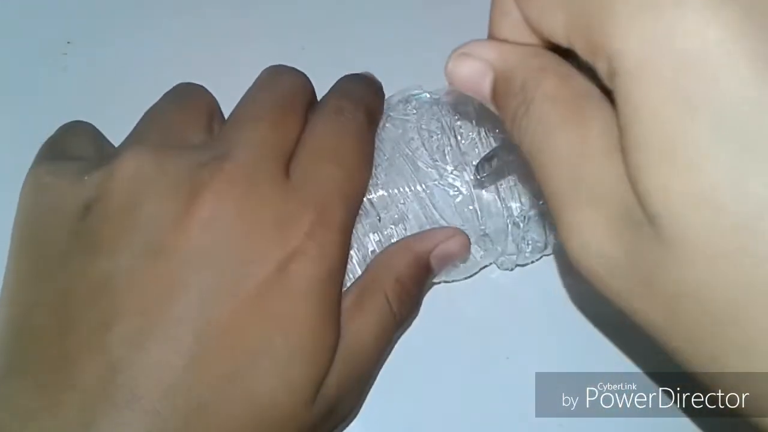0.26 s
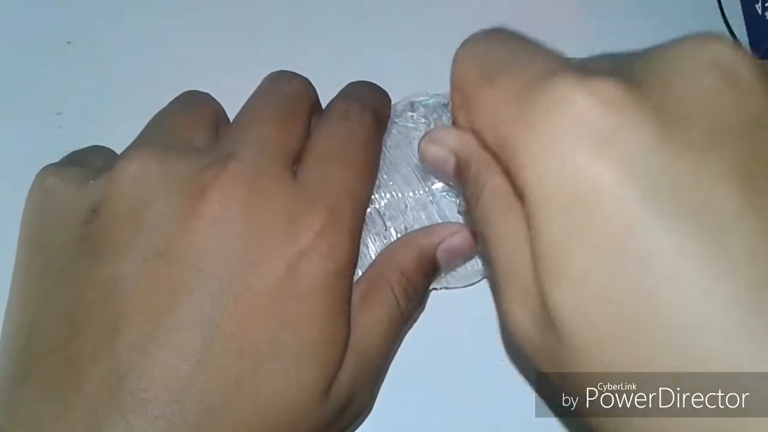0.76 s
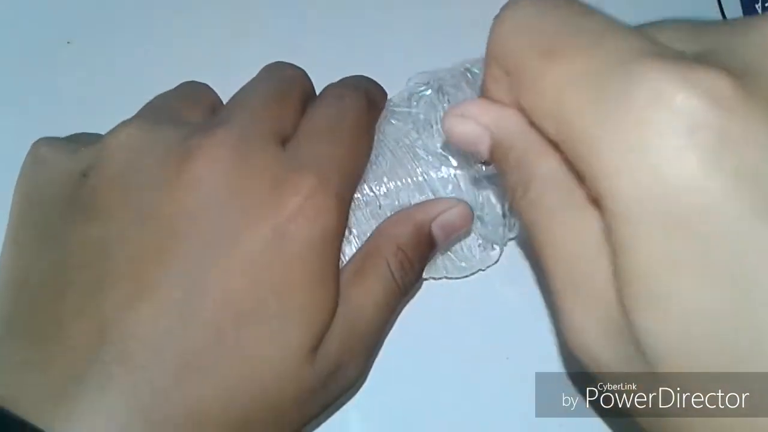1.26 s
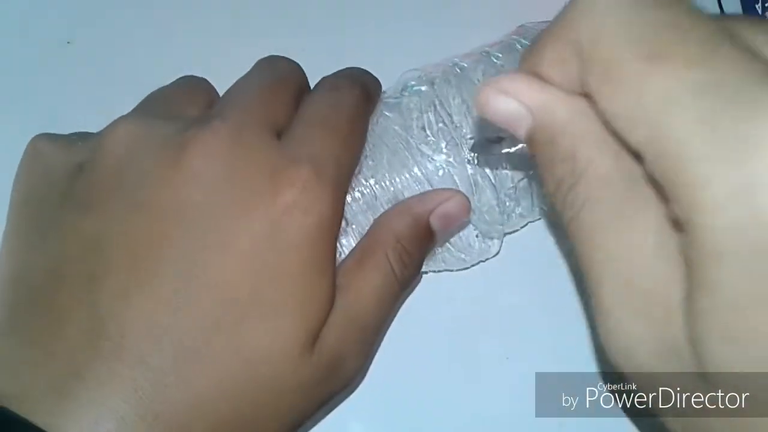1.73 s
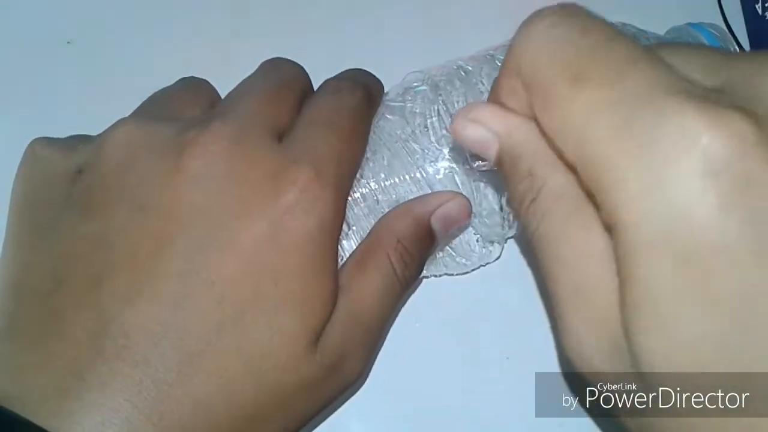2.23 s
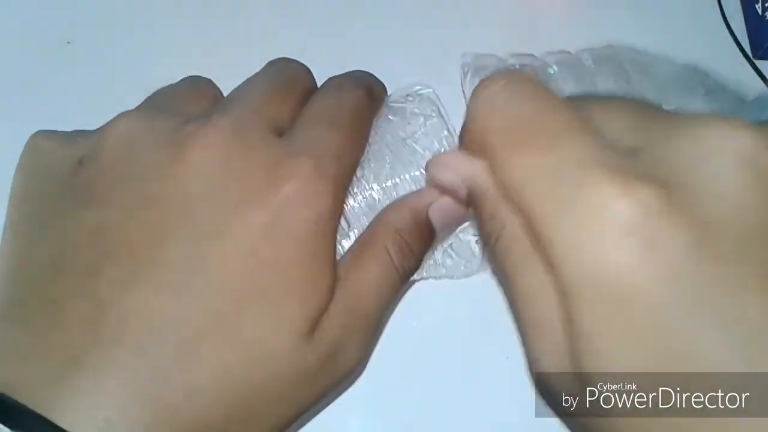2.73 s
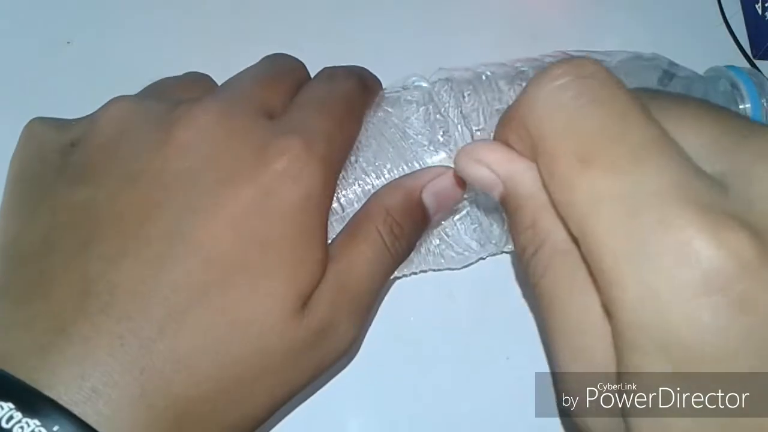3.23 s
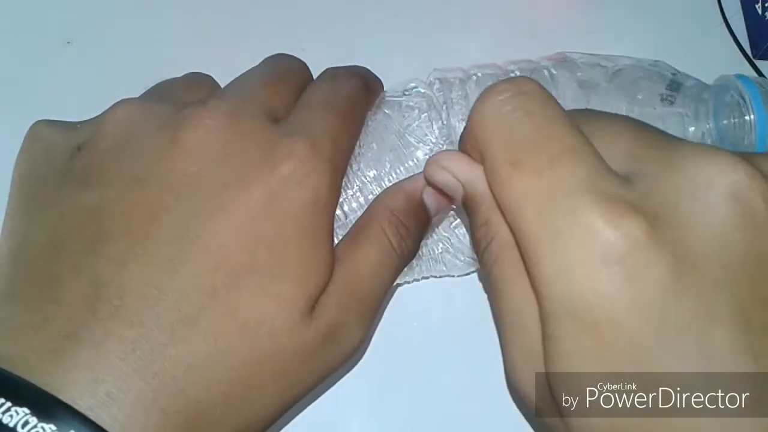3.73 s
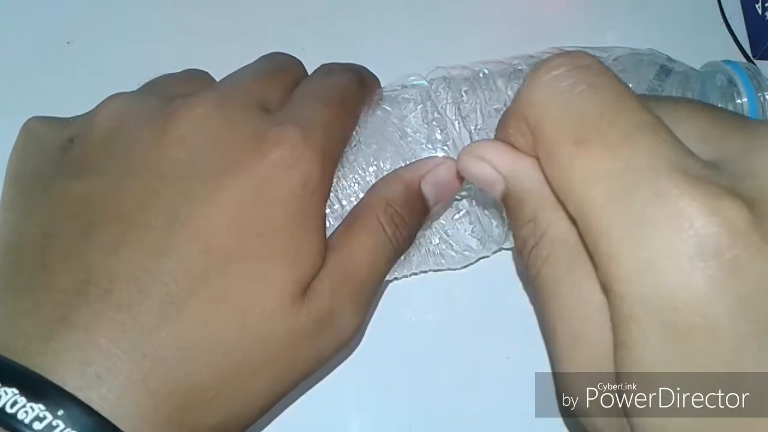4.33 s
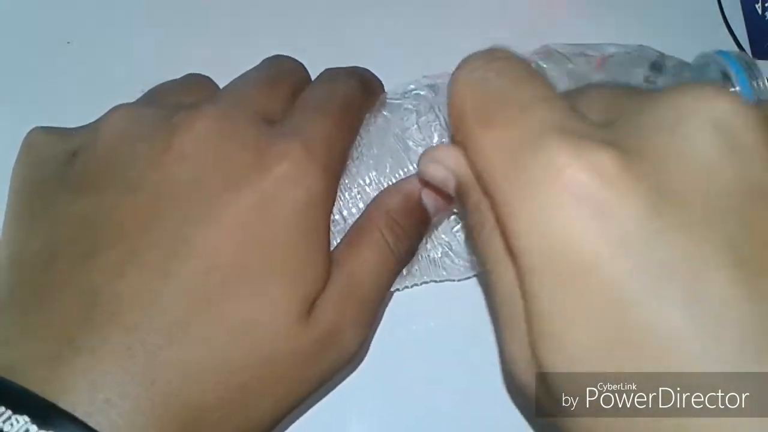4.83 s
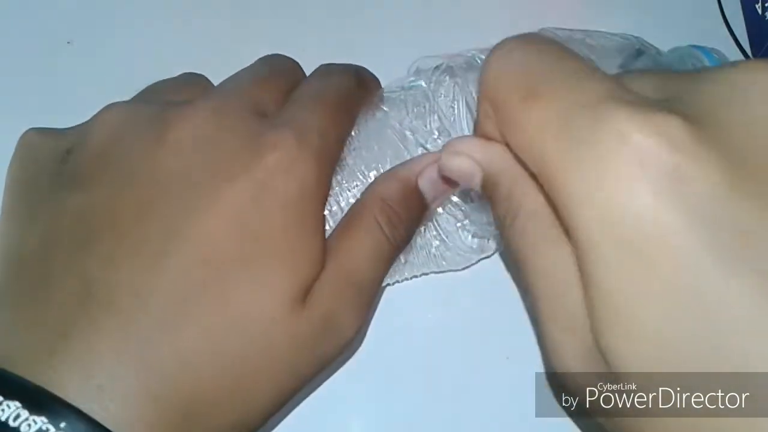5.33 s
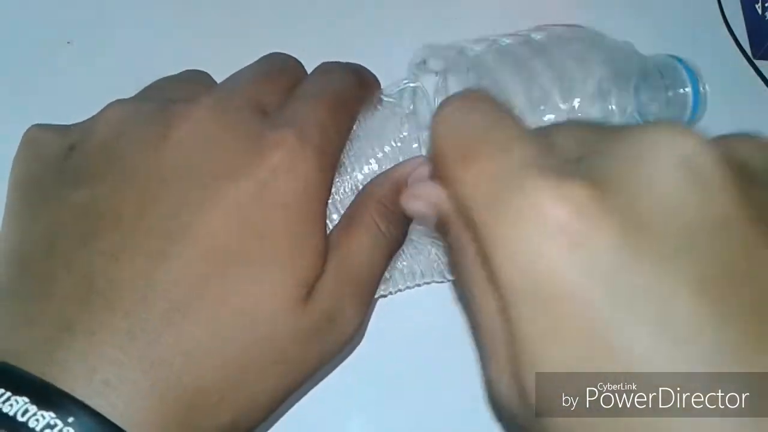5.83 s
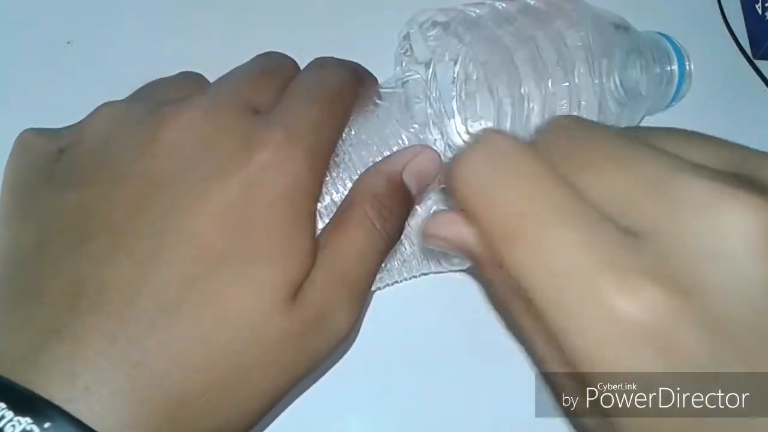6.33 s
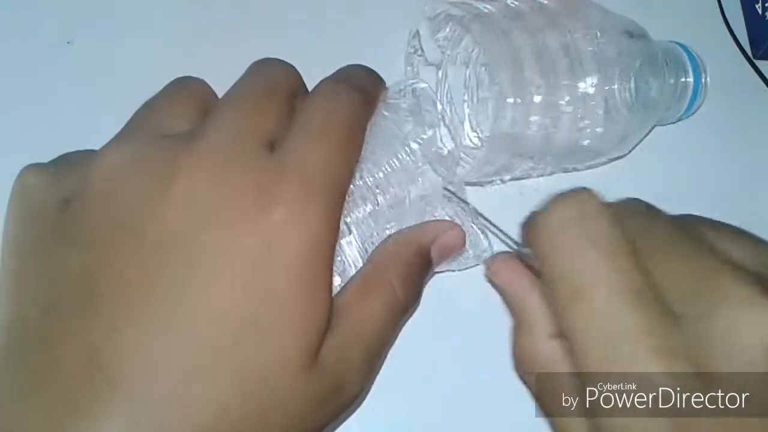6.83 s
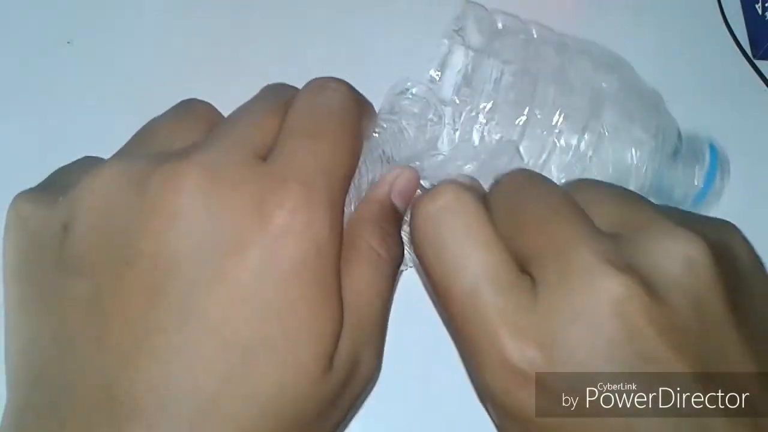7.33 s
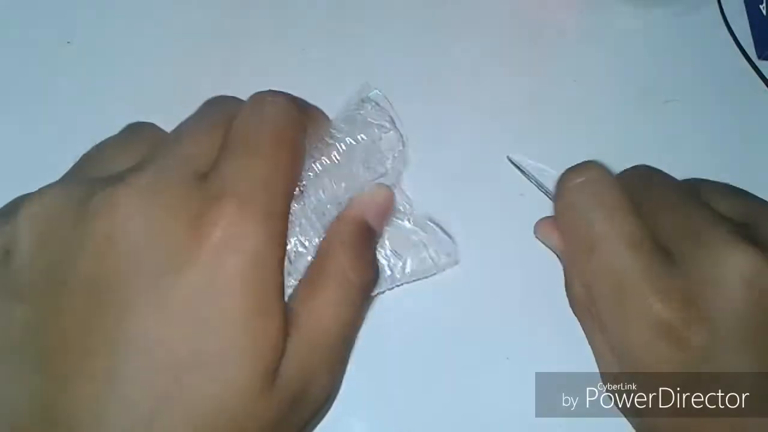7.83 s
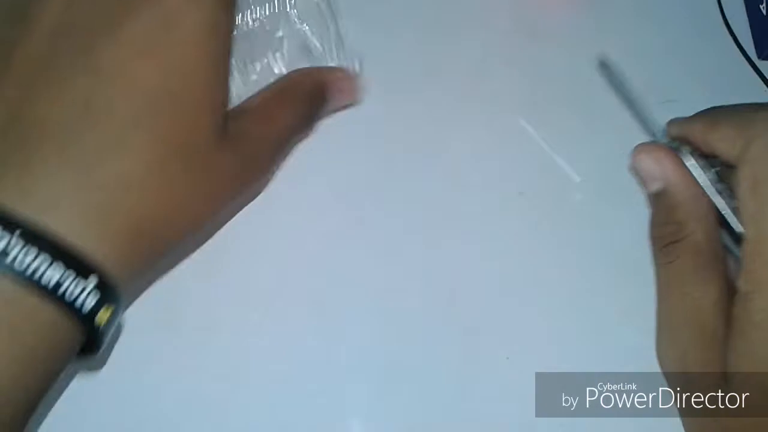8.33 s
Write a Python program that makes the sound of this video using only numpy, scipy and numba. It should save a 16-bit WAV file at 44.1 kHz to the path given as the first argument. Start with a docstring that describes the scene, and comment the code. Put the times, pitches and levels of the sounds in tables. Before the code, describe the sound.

A thin plastic bottle is pressed against a desk and cut with a small blade, close to the microphone. It starts with a few sharp snaps and a brief rasp as the blade runs over the ribs. Irregular clusters of hollow pops and crackles follow, with fine scraping and rubbing between them. A last, slightly fuller burst comes as the halves separate, then the crackle thins out. The room is small, with a quiet hiss.

```python
"""A thin plastic bottle is held on a desk, squeezed and cut open with a small blade, close to a microphone.
From the start its wall buckles in snaps that ring the ribs, air and wall; between snaps, blade and
fingers rub it in dense tiny slips. Near 0.8 s the blade ratchets over the ribs. Clusters of snaps follow
as the cut grows, more bass passes through the desk as the halves come loose, and at 8.1 s the grip
loosens and the fine crackle ends. Throughout, a small room answers over quiet hiss and faint tones."""
import sys
import numpy as np
from scipy import signal
from scipy.fft import rfft, irfft
from scipy.io import wavfile
from numba import njit

SR = 44100
rng = np.random.default_rng(int(sys.argv[2]) if len(sys.argv) > 2 else 0)


def generate_wav(sig):
    """Save sig (samples, or channels by samples) to the path in sys.argv[1] as 16-bit PCM at SR."""
    pcm = np.round(np.clip(np.atleast_2d(sig).T, -1, 1) * 32767).astype(np.int16)
    wavfile.write(sys.argv[1], SR, pcm)


N = 377937
TIME = np.arange(N) / SR
RASP_S, RASP_LENGTH_S, RASP_STEPS = .769, .134, 17


def bottle():
    """Modal superposition: ribs, air, wall and a treble crack ring to the same snaps and strokes."""
    # Each row: frequency of a mode in Hz, relative level in dB, time to decay by 60 dB in seconds.
    rib_modes = [(1057.6, 11, 0.049), (1173.6, 9.5, 0.046), (1332, 16, 0.013), (1591, 1.5, .018),
                 (1796, 2.5, 0.04), (2085, 4, 0.028), (2276, -3.5, 0.048), (2622, 7.5, 0.0091),
                 (3034, -5, 0.03), (3330, -11, 0.022)]
    air_modes = [(210, -5, 0.014), (332, 16, 0.045), (470.2, 7.5, 0.064)]
    wall_modes = [(603, -8.5, 0.023), (646, 22, 0.038), (685, -6.5, 0.046), (800, -34.5, .02)]
    crack_modes = [(3950, 0.5, 0.0032), (4600, -10.5, 0.0057), (5340, 5, 0.0016), (7740, 2.5, 0.001),
                   (9340, -4, 0.00062), (11000, -4, 0.0014), (13850, -18, 0.0027)]
    # Brightness as the cut grows. Each row: time in seconds, tilt of ribs, air and crack in dB per octave.
    brightness = [(0, 6.5, -4, -3), (.85, 8.5, 6.5, -6.5), (1.301, 2.5, 5, -3.5), (2.6, 5, 13.5, 0),
                  (4.002, 3.5, 2.5, -7), (4.95, 4.5, -4, -0.5), (5.502, 6.5, -3, 6.5), (6.5, 5.5, 7, 2),
                  (7.5, 3, 4, -11.5), (8.57, -2.5, 10, 1)]
    tilt_s, *tilts = np.transpose(brightness)
    rib_tilt, air_tilt, crack_tilt = (np.interp(TIME, tilt_s, tilt) for tilt in tilts)
    rub_db = strokes()
    at, snap_db = buckles(rub_db)
    shape = held_shape(at, snap_db)
    # Each row: modes, tilt, rattle decay in seconds, rattle size against the blow, slips per second.
    parts = [(rib_modes, rib_tilt, 0.0062, 0.54, 2070),
             (air_modes, air_tilt, 0.0049, 0.14, 710),
             (wall_modes, 0, 0.00063, 0.21, 670),
             (crack_modes, crack_tilt, 0.0038, 1, 3750)]
    return sum(resonator(at, shape, snap_db[k], rub_db[k], *part) for k, part in enumerate(parts))


def buckles(rub_db):
    """Snap-through buckling: sample positions and part levels of clear snaps, rasp and crackle."""
    # Each row: time in seconds, rib level in dB, then air, wall and crack in dB relative to the ribs.
    snaps = [(0.05, -45.5, -14, 2, -10), (0.138, -49, -2, 3, -14), (0.221, -15, -9.5, -4.5, 0.5),
             (0.24, -19.5, -4.5, 12.5, -6.5), (0.359, -55.5, -21, -1, 9.5), (0.4849, -50, -3, 12, -31),
             (0.5506, -19, -5.5, -7, -6.5), (0.655, -57, 16, 17.5, -24), (0.7382, -12.5, -11, -13.5, -22.5),
             (0.946, -41, -18, -3.5, 7.5), (1.0216, -37.5, -3, 2, -7), (1.0999, -32.5, -12, -11, -5),
             (1.1445, -44, -3, -2.5, 8), (1.2108, -17.5, -23, -9.5, -1), (1.2876, -36, -30, -6, 2),
             (1.321, -31.5, -31, -2, 1), (1.3752, -33, 1, 8, -9), (1.4941, -13, -19.5, -16.5, -9),
             (1.544, -34.5, -30, 16.5, -30), (1.5656, -37.5, -23, -1, -7), (1.943, -36, -15, -3, -4.5),
             (2.0487, -40, 2, -1.5, -6), (2.182, -51.5, -5, 11.5, -6), (2.2364, -51.5, -16, 4, 1),
             (2.5086, -22, -23, -10, -28.5), (2.517, -21, -21, -4, -12), (2.5426, -30.5, -15, 6, -7),
             (2.5567, -13.5, -35, -1, -5), (2.5791, -13, -11.5, -5, -1.5), (2.5977, -12.5, -31.5, -3, -4),
             (2.616, -25, 2, 0, -6), (2.634, -12.5, -15.5, -4, -10), (2.6675, -19, -24, 5.5, -9.5),
             (2.7052, -28, -5, 5, -26), (2.7856, -38, -16, 3, 9.5), (2.8043, -38.5, 1, 11, 1.5),
             (2.833, -47, -17.5, -1, 9), (2.8519, -16.5, -45, -6, -4.5), (2.8885, -18, -40, -3, -2.5),
             (2.9716, -19, -45, -4, 5), (3.0471, -33.5, 3, 5.5, -13), (3.069, -38.5, -6, 0, 0),
             (3.0804, -40, 8, 19, -4), (3.1302, -50.5, 4, 5, 9), (3.1756, -41.5, -17, -20, -2.5),
             (3.206, -48, -15, 14, 1), (3.2636, -44.5, -4, -2, -3), (3.3527, -55, -26, -8.5, 8.5),
             (3.543, -29, -10, 3, -10.5), (3.5682, -27, -6, 4.5, -13), (3.5957, -19, -13, 0, -14),
             (3.6116, -22, 0, -16, -10), (3.647, -22, -1, -1, -9), (3.6618, -28, -10, 1, -3),
             (3.7071, -15.5, -11, 2.5, -6.5), (3.7562, -14, -2, -5, -0.5), (3.8065, -13, -6, -3, -8),
             (3.8947, -12.5, -13.5, -1, -5), (3.943, -32, 6.5, 6, -3), (3.9751, -12.5, -9, -6.5, -1.5),
             (4.1503, -46, -9, 10.5, -47.5), (4.2263, -23.5, -11, -11, -16.5), (4.2685, -28, -9, -13.5, 5),
             (4.3162, -33.5, -9, 6, -7.5), (4.3333, -27, -6, 7, -18), (4.3514, -22, -5, 4.5, -6.5),
             (4.3749, -23.5, -11, -10, -24), (4.396, -32, -13, -3, -20), (4.41, -36, 3, 4, -8),
             (4.4332, -33.5, -3, 5, -9), (4.5311, -32.5, 0, 6, -16), (4.5677, -26, -27, -1.5, -19.5),
             (4.6688, -38, -24, -5.5, -2), (4.6938, -31.5, -30, 1, 4), (4.7023, -32.5, -23, 5.5, 1.5),
             (4.9345, -13, -9, -10, -8.5), (4.9691, -16.5, -4.5, -31.5, -13.5),
             (4.9816, -14.5, -15, -19, -14), (5.0192, -17.5, -17, -7, -15), (5.0512, -26, -19, -4, -18),
             (5.12, -37, -3, -15, -1), (5.2858, -29.5, -41, -4.5, 1.5), (5.3339, -17, -22, -4.5, -16),
             (5.3533, -24, -37, -30, 6), (5.3861, -21, -27, -3, -5), (5.3955, -35, -23, 3, 7.5),
             (5.4273, -33, -22, 7, -1), (5.4422, -43, -10, 12, -3), (5.4784, -33, -23, 9, -22),
             (5.6184, -43.5, -6, 9, -18), (5.6736, -53, -30, 7, -19), (5.7531, -25.5, -41, 5, -1.5),
             (5.8018, -28, -35, 2, -6), (5.907, -22.5, -4, 10, -9.5), (6.0135, -27.5, -38, -9.5, -8),
             (6.156, -35, 4.5, 14, -38.5), (6.2023, -41, 1, 10, 0), (6.2444, -35, -17, 7, -1),
             (6.3119, -32.5, -32, -5, -6), (6.3463, -38, -6.5, 0, -4), (6.3573, -44, -12, 4, 2),
             (6.4576, -33.5, -34, -17, -14), (6.51, -33.5, -18, 1.5, 4.5), (6.542, -35.5, -23, 5, -12),
             (6.5772, -36.5, -32, 8.5, 13), (6.6518, -37.5, -11, -8, -2), (6.737, -40, -23, -27, -8.5),
             (6.804, -49.5, 23, 27.5, -18), (6.9592, -23.5, -25, -10, -8.5), (6.9974, -20.5, -1, 8, -30),
             (7.076, -51.5, 15, 11, -27), (7.1627, -34, -15, 1.5, -20), (7.1929, -30.5, -16, 2, -9),
             (7.2133, -32, -28, 4, -12), (7.2293, -36.5, -25, -16, 2.5), (7.3403, -39, -31, -8, -18),
             (7.4393, -28.5, -17, 6, -28), (7.4475, -20, -8, -12, -16), (7.4564, -18, -7.5, 8.5, -8.5),
             (7.5234, -28, -30, 14, -19), (7.673, -23.5, -11.5, 0.5, -4.5), (7.704, -46, -24, 5, -21),
             (7.7476, -33, -1, 5, -3), (7.7808, -8.5, -16, -22, 1.5), (7.8115, -33, -23, -14, 13),
             (7.8535, -14.5, 8.5, 4, -22), (7.9234, -13, -1.5, 3, -0.5), (7.9545, -45, -8, 8, 5),
             (7.9743, -26, -19, -18, -6), (8.001, -18.5, -43, -12, -5.5), (8.039, -20, -18, -5, -12),
             (8.067, -27, -25, -7, -19), (8.0856, -28.5, -7, -2, -6), (8.1203, -31, -17, -26, -23),
             (8.205, -35, 5.5, 10, 8), (8.303, -39.5, -2, 3, -8), (8.359, -56, -10, -7.5, 14),
             (8.402, -25.5, -2, -1, -12), (8.414, -32.5, -2, -14, -8)]
    snap_s, *snap_db = np.transpose(snaps)
    rasp_at, rasp_db = rasp()
    crackle_at, crackle_db = crackle(rub_db)
    at = np.concatenate([snap_s * SR, rasp_at, crackle_at]).astype(int)
    return at, np.hstack([part_levels(*snap_db), rasp_db, crackle_db])


def rasp(jitter_steps=0.13, end_loss_db=6, spread_db=1.5):
    """A nearly periodic impulse train: the blade ratchets over the ribs, hardest at mid-travel."""
    step, *size = rng.standard_normal((RASP_STEPS, 5)).T
    travel = (np.arange(RASP_STEPS) + jitter_steps * step) / (RASP_STEPS - 1)
    peak_db = np.array([-9, -26, -32.5, -19.5])[:, None]  # ribs, air, wall, crack
    arch_db = peak_db - end_loss_db * (2 * travel - 1) ** 2
    return (RASP_S + RASP_LENGTH_S * travel) * SR, arch_db - spread_db * np.array(size)


def crackle(rub_db, per_second=40, release_s=8.1, spread_db=5, rub_limit_db=-40):
    """A random point process: small buckles follow the rubbing level until the grip loosens."""
    at = rng.integers(0, int(release_s * SR), int(per_second * release_s))
    shared, *own = rng.standard_normal((len(at), 5)).T
    scatter_db = spread_db * (shared + np.array(own)) / np.sqrt(2)
    excess_db = np.maximum(rub_db[0, at] - rub_limit_db, 0)  # harder rubbing crackles no louder
    lift_db = np.array([6.04, 1.1, 2.38, 9.2])[:, None]  # ribs, air, wall, crack
    return at, rub_db[:, at] - excess_db + lift_db + scatter_db


def held_shape(at, snap_db, firm_db=-52):
    """Multistability: the shell keeps one numbered shape from each firm buckle to the next."""
    firm = np.flatnonzero(snap_db.max(axis=0) > firm_db)
    outside_rasp = np.abs(at[firm] / SR - RASP_S - RASP_LENGTH_S / 2) > RASP_LENGTH_S / 2
    firm = firm[outside_rasp]  # the blade holds the shape through the rasp
    firm = firm[np.argsort(at[firm])]
    return np.append(0, firm + 1)[np.searchsorted(at[firm], np.arange(N), side="right")]


def strokes(swell_db=28, roundness=1.12):
    """Incoherent addition: swelling strokes of blade and fingers sum in power to each part's level in dB."""
    # Each row: peak time, rise and fall in seconds, rib level in dB,
    # then air, wall and crack in dB relative to the ribs.
    gestures = [(.065, 0.18, 0.048, -56, 2, 4, -15), (.15, 0.051, 0.088, -49, -5, 6.5, -21),
                (.232, 0.02, 0.12, -36.5, 1, 8, -9), (.564, 0.032, 0.11, -48, 5, -7, -10),
                (0.892, 0.13, 0.087, -22, -16, -3, -23), (1.161, 0.18, 0.11, -40.5, 0, 6.5, -11),
                (1.455, 0.18, 0.13, -40.5, -6, 9.5, -11), (1.962, 0.059, 0.15, -45, -4, 8, -16.5),
                (2.518, 0.032, .06, -28, -4, 0.5, -34), (2.573, 0.05, 0.13, -26.5, -26, 7.5, -21),
                (2.729, 0.1, 0.11, -33, -11, 7, -19), (2.903, 0.13, 0.21, -37, -31, 0.5, -13.5),
                (3.063, 0.073, 0.1, -45.5, -2, 10.5, -15), (3.226, 0.09, .13, -46.5, -5, 9.5, -15),
                (3.58, 0.046, 0.21, -42.5, 9, -3, -24), (3.8, 0.35, 0.44, -53, -11, -14, -8.5),
                (4.243, 0.034, 0.059, -37, 2, 7.5, -27), (4.387, 0.075, 0.068, -29, -3, 6.5, -18),
                (4.578, 0.055, 0.083, -40.5, 3, 0.5, -21), (4.705, 0.065, 0.074, -56, -8, 1, -4),
                (4.951, 0.028, 0.21, -33, 5, -3, -25), (5.048, 0.13, 0.077, -29.5, 3.5, 2, -23),
                (5.348, 0.11, 0.19, -46.5, -15, 4.5, -11), (5.501, 0.14, 0.093, -36, -22, 6.5, -17),
                (5.699, 0.076, 0.046, -37, -22, 7, -19.5), (5.78, 0.049, 0.25, -46.5, -18, 0.5, -5),
                (5.921, 0.024, 0.068, -39, -6, 13, -18), (6.166, 0.6, 0.29, -53.5, -3, 3.5, -16.5),
                (6.32, 0.014, 0.046, -43.5, -12, -2, -18), (6.355, .04, 0.026, -48, -8, 4, -14.5),
                (6.526, 0.16, 0.073, -47.5, -11, 2.5, -27), (6.586, 0.026, 0.042, -39, -35, 3.5, -13),
                (6.761, 0.23, 0.21, -51.5, -7, -1, -13.5), (7.009, 0.28, 0.26, -55, 5, -6, -15),
                (7.179, 0.043, .1, -44.5, -9, 3, -19), (7.35, 0.12, 0.11, -47.5, -16, -9, -22),
                (7.509, 0.095, 0.054, -22, -14, 2.5, -20), (7.706, 0.047, 0.036, -26.5, -18, -0.5, -15.5),
                (7.794, 0.057, 0.16, -37, -10, 1, -9), (7.93, 0.14, 0.25, -40, 5.5, 5, -11.5),
                (8.211, 0.32, 0.19, -43, -10, 0, -7), (8.332, 0.04, 0.13, -49.5, -13, 8, -3.5),
                (8.421, 0.026, 0.15, -40, 5.5, 8, -21)]
    power = 1e-12
    for peak_s, rise_s, fall_s, *db in gestures:
        from_peak = np.maximum((peak_s - TIME) / rise_s, (TIME - peak_s) / fall_s)
        swell = undb(-2 * swell_db * from_peak ** roundness)
        power = power + undb(2 * part_levels(*db))[:, None] * swell
    return 10 * np.log10(power)


def slips(per_second, unevenness=1.6):
    """Stick-slip friction: dense tiny clicks of uneven size, at unit rms."""
    when, size, sign = rng.random((3, N))
    strength = undb(-unevenness * np.log(size + .02))
    return level((when < per_second / SR) * strength * np.sign(sign - .5), 0)


def resonator(at, shape, snap_db, rub_db, modes, tilt_db, rattle_s, rattle_size, slip_rate):
    """Forced vibration: snaps and slips drive one part, whose modes shift with every new shape."""
    detune, scatter_db = 0.033, 2.5  # spread of mode frequency (as a fraction) and level between shapes
    rattle_samples = rattle_s * SR
    blows = np.zeros(N)
    blows[at] = undb(snap_db)
    # A snap is one sharp blow, then a short rattle that dies away.
    envelope = signal.lfilter([1], [1, -np.exp(-1 / rattle_samples)], blows)
    rattle = envelope * rng.standard_normal(N) * rattle_size * np.sqrt(2 / rattle_samples)
    friction = slips(slip_rate) * undb(rub_db)
    pivot_hz = modes[len(modes) // 3][0]
    snap_power = rub_power = snapping = rubbing = 0
    for hz, db, t60 in modes:
        tuning, coupling, polarity = rng.standard_normal((len(at) + 1, 3)).T
        decay = np.log(1000) / (t60 * SR)
        pole = np.exp(2j * np.pi * hz * (1 + detune * tuning) / SR - decay)
        gain = undb(db + scatter_db * coupling[shape] + tilt_db * np.log2(hz / pivot_hz))
        snapping = snapping + ring(gain * (np.sign(polarity[shape]) * blows + rattle), pole, shape)
        rubbing = rubbing + ring(gain * friction, pole, shape)
        # Expected powers before tilt and scatter normalise the two responses.
        snap_power += undb(2 * db) * (1 + rattle_size ** 2 / (1 + decay * rattle_samples)) / 4
        rub_power += undb(2 * db) / (4 * decay)
    return snapping / np.sqrt(snap_power) + rubbing / np.sqrt(rub_power)


@njit
def ring(force, pole, shape):
    """A damped harmonic oscillator: one mode, whose pole follows the present shape of the bottle."""
    motion, state = np.empty(len(force)), 0j
    for i in range(len(force)):
        state = state * pole[shape[i]] + force[i]
        motion[i] = state.imag
    return motion


def radiation(shell, cutoff_hz=247.4):
    """Radiation efficiency: the thin shell sends out little bass, but a trace passes through the desk."""
    # Each row: time in seconds, gain of the path through the desk in dB.
    desk_path = [(0, -25.5), (2.8, -21), (3.5, -21), (7, -18.5), (7.7, -14.5), (8.57, -9)]
    airborne = signal.sosfilt(signal.butter(8, cutoff_hz, "high", fs=SR, output="sos"), shell)
    return airborne + undb(np.interp(TIME, *np.transpose(desk_path))) * shell


def room(direct, gain_db=-26, t60_s=0.31, cutoff_hz=3900, onset_s=0.0039):
    """Diffuse reverberation: desk and walls send back a short, dull, exponentially decaying tail."""
    t = TIME[:SR // 2]
    tail = rng.standard_normal(len(t)) * 10 ** (-3 * t / t60_s) * np.clip(t / onset_s, 0, 1)
    tail = signal.lfilter(*signal.butter(1, cutoff_hz, fs=SR), tail)
    return signal.fftconvolve(direct, tail * undb(gain_db) / np.sqrt(np.sum(tail ** 2)))[:N]


def hiss(rms_db=-59):
    """Spectral shaping: white noise is weighted into a smooth, quiet hiss."""
    # Each row: frequency in Hz, relative spectral density in dB.
    spectrum = [(25, -14.5), (60, -12.5), (170, -8.5), (300, -19), (600, -18.5), (1500, -16), (3000, -26),
                (5000, -35.5), (9000, -47.5), (16000, -40.5)]
    hz, db = np.transpose(spectrum)
    bin_hz = np.fft.rfftfreq(N, 1 / SR) + 1
    weight = undb(np.interp(np.log(bin_hz), np.log(hz), db))
    return level(irfft(rfft(rng.standard_normal(N)) * weight, N), rms_db)


def faint_tones(throb_hz=1590, pulse_hz=4.5, whine_hz=5545, whine_db=-79):
    """Amplitude modulation: one tone throbs on and off while a fainter whine fades down midway."""
    # Each row: time in seconds, peak level of the throb in dB.
    throb_levels = [(0, -68), (.7, -61), (2.4, -60), (3.3, -74), (4.15, -62), (4.8, -72), (5.2, -62),
                    (5.6, -70), (6.1, -64), (6.9, -76)]
    pulse = np.clip(.9 + np.cos(2 * np.pi * pulse_hz * (TIME - .11)), 0, 1)
    throb = pulse * undb(np.interp(TIME, *np.transpose(throb_levels))) * sine(throb_hz)
    fade = np.clip((5.5 - TIME) / 1.5, .2, 1)
    return throb + fade * undb(whine_db) * sine(whine_hz)


def whistles(edge_s=.015):
    """Gated pure tones: a few brief whistles sound far off."""
    # Each row: start in seconds, length in seconds, frequency in Hz, peak level in dB.
    pips = [(4.8, .1, 4000, -76), (5.14, .11, 4404, -72), (5.56, .07, 3973, -69), (7.27, .09, 6492, -74)]
    sound = 0
    for start, length, hz, db in pips:
        gate = np.clip(np.minimum(TIME - start, start + length - TIME) / edge_s, 0, 1)
        sound = sound + undb(db) * gate * sine(hz)
    return sound


def part_levels(ribs_db, *relative_db):
    """Decibel addition gives the levels of ribs, air, wall and crack, one row each."""
    return np.array([ribs_db] + [ribs_db + db for db in relative_db])


def sine(hz):
    return np.sin(2 * np.pi * hz * TIME)


def undb(db):
    return 10 ** (np.asarray(db) / 20)


def level(x, db):
    return x * undb(db) / np.sqrt(np.mean(x ** 2))


def scene():
    """Linear superposition: bottle, room and background add in one channel."""
    direct = radiation(bottle())
    return (direct + room(direct) + hiss() + faint_tones() + whistles())[None]


def record(dry, port_hz=7950, port_width_hz=600, port_db=5):
    """Port resonance lifts a treble band; saturation rounds the peaks; filters trim bass and top."""
    port = signal.lfilter(*signal.iirpeak(port_hz, port_hz / port_width_hz, fs=SR), dry)
    heard = np.tanh(dry + undb(port_db) * port)
    heard = signal.sosfilt(signal.butter(2, 53, "high", fs=SR, output="sos"), heard)
    heard = signal.sosfilt(signal.butter(16, 15300, fs=SR, output="sos"), heard)
    heard = heard - .0006  # steady offset of the converter
    return signal.sosfilt(signal.ellip(12, .5, 90, 16600, fs=SR, output="sos"), heard)


dry = scene()
out = record(dry)
generate_wav(out)
```